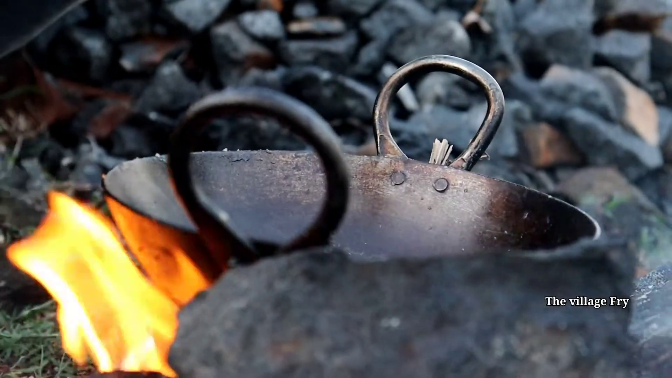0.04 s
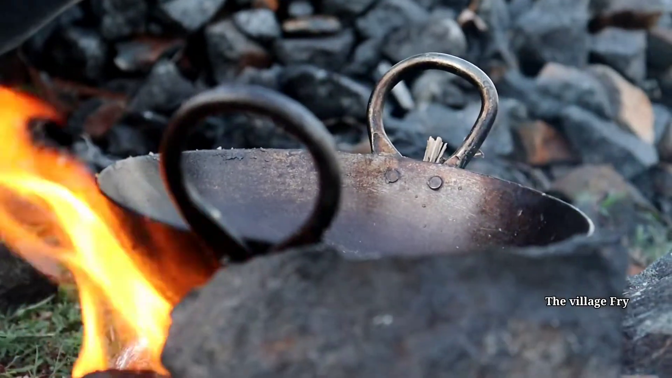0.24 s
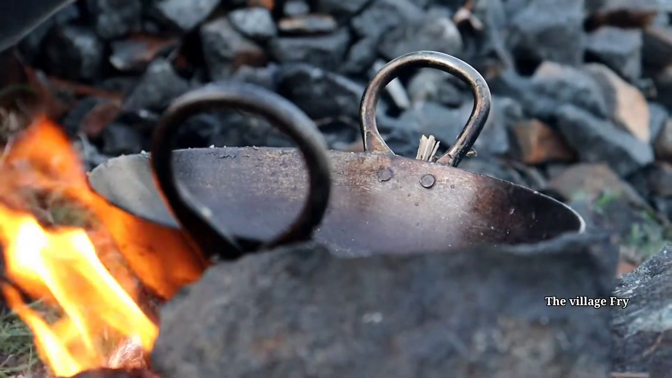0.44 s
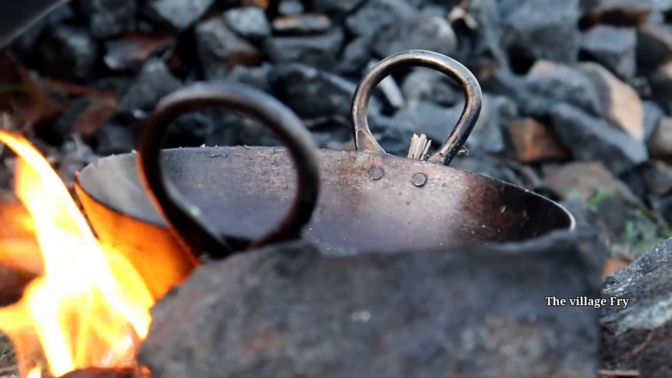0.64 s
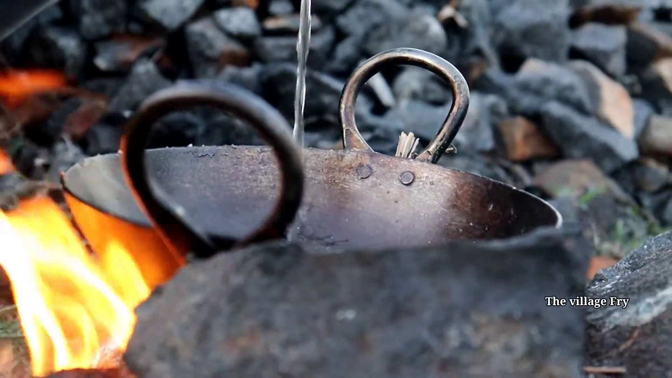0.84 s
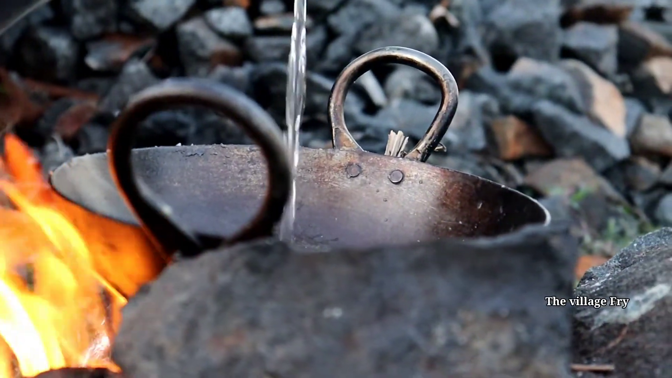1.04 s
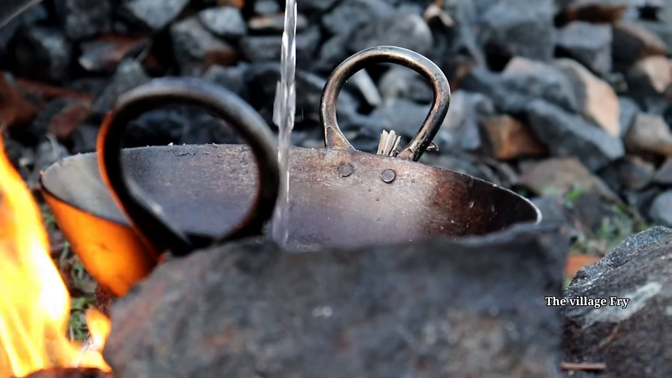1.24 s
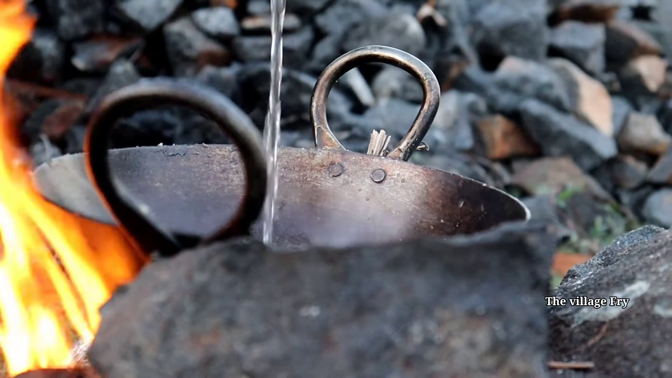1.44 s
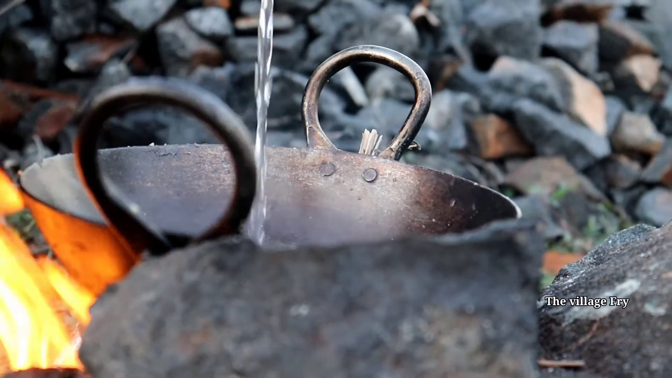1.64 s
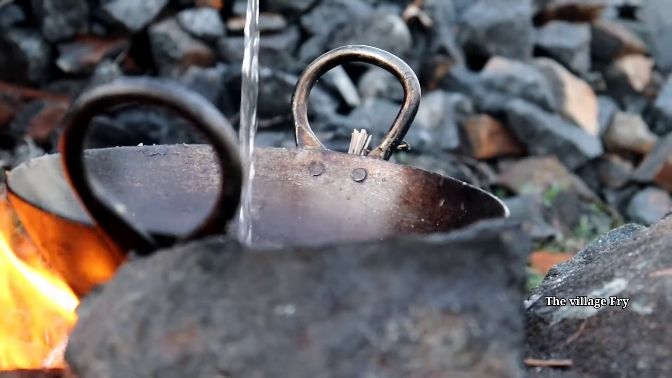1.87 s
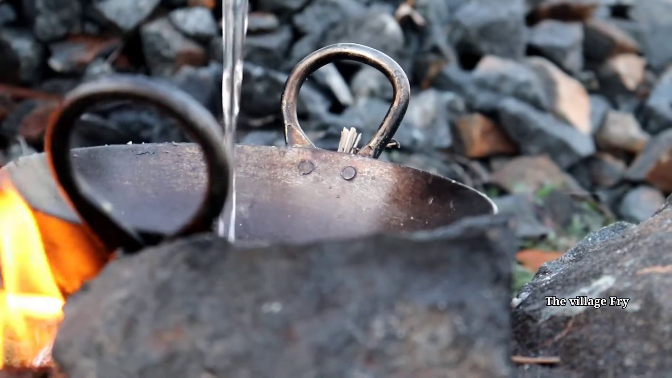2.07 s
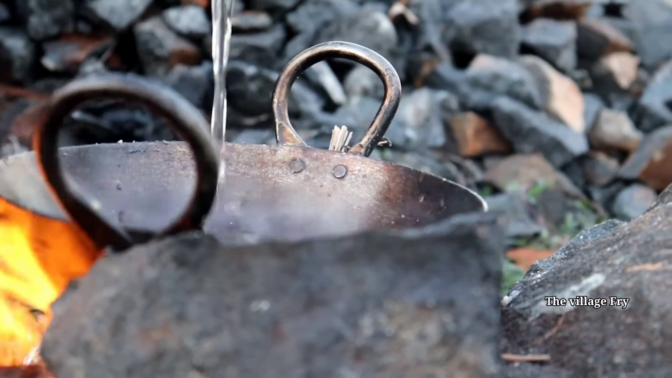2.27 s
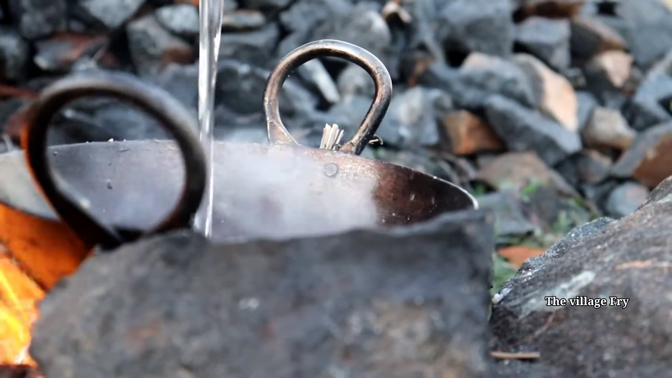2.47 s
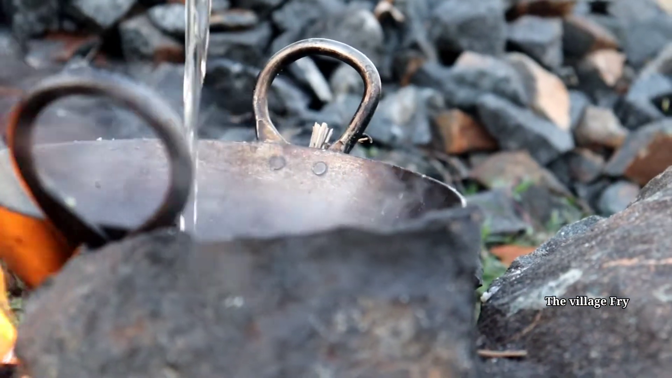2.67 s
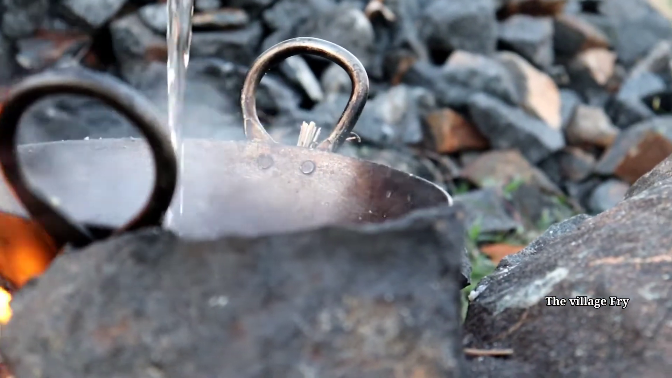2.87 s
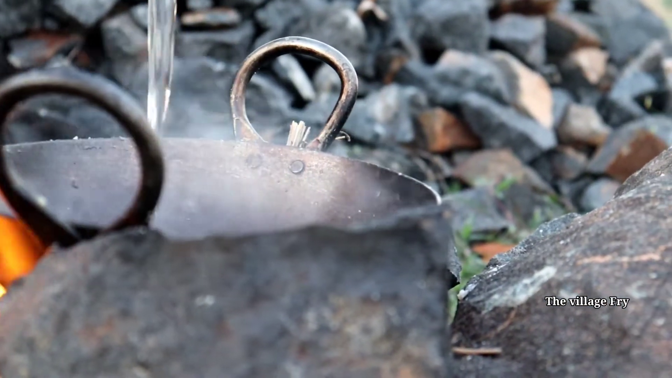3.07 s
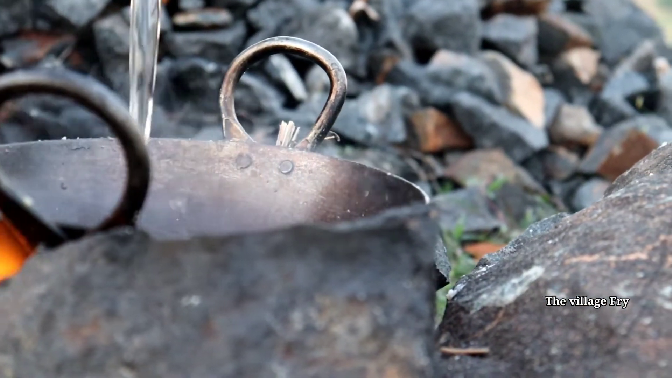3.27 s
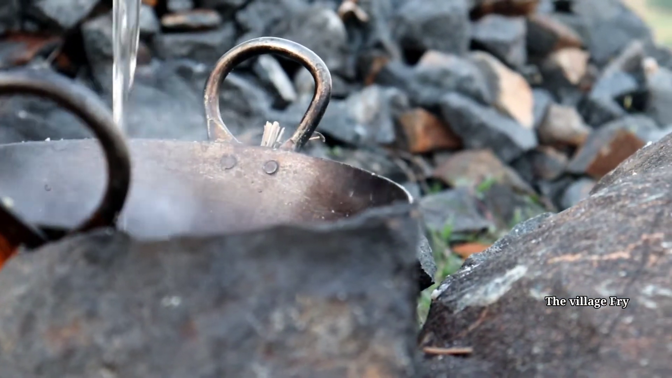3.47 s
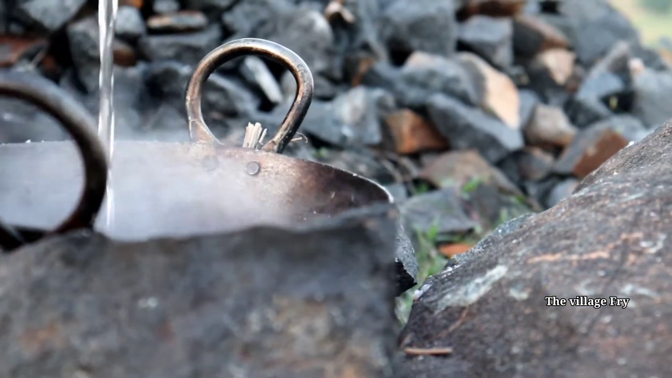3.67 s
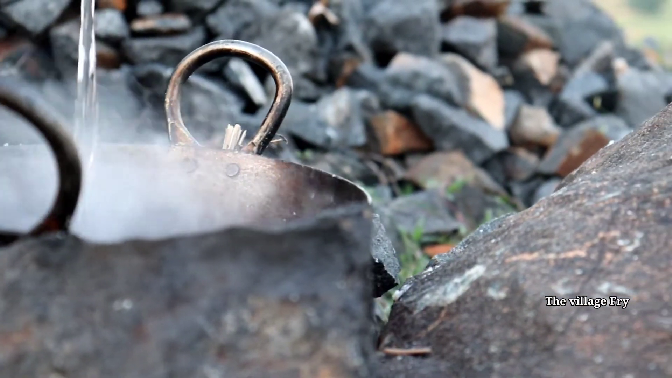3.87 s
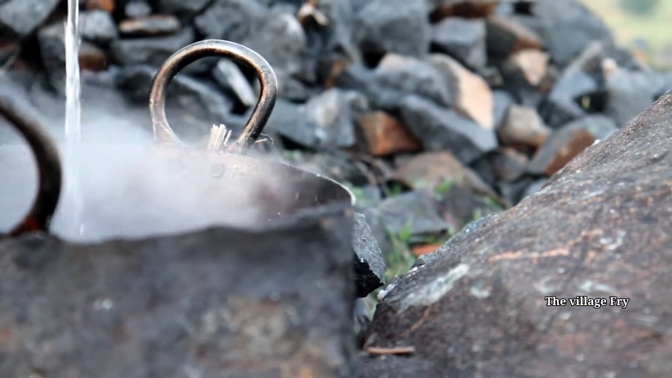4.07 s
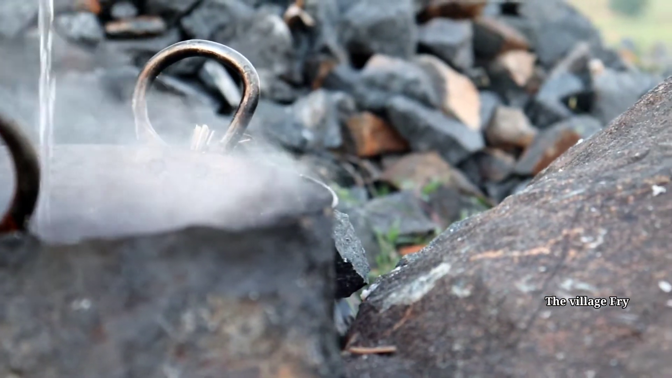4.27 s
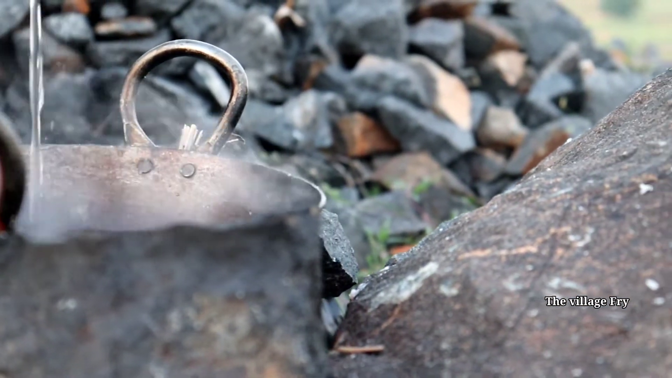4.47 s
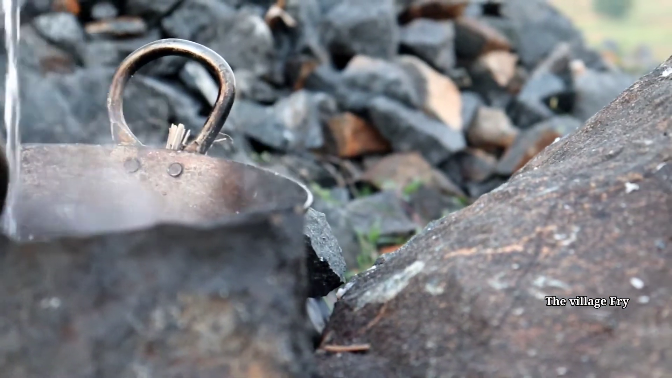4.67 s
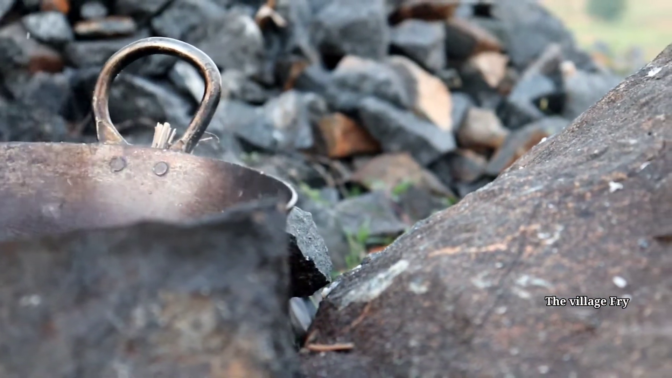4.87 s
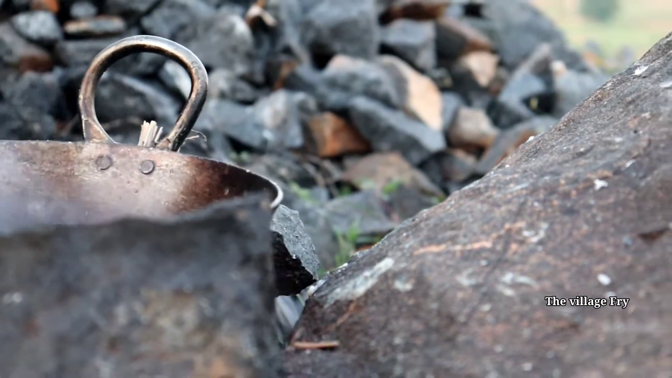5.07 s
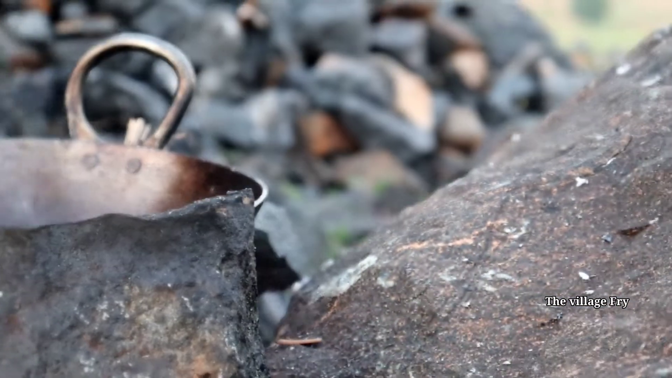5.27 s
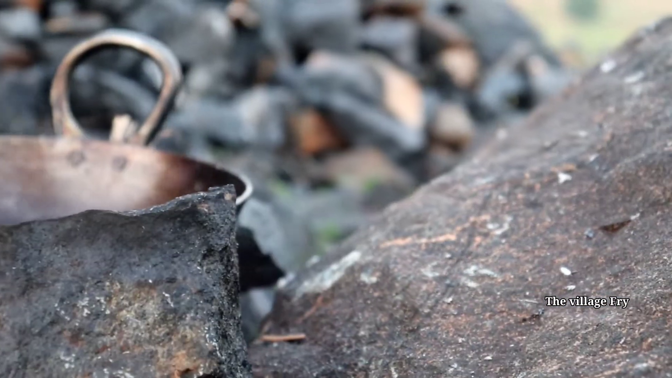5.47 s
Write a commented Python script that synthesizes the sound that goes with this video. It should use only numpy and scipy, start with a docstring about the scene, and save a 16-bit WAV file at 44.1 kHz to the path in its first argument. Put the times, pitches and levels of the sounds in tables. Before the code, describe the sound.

Water hits a scorching iron pan over a wood fire and hisses into steam, with sharp droplet pops, wind thumps and later bubbling.

```python
"""Among stones, over a wood fire, water is poured into a very hot iron pan and flashes into steam.
Steam is drifting noise rung by the pan; bubbles are climbing sines, each loud one with a splash.
Droplets and burning wood are filtered noise bursts, and the fire bed is steady patchy noise.
Wind is low rumble in gusts plus single pressure swings, separate on the two microphone ports."""
import sys
import numpy as np
from scipy import signal
from scipy.fft import rfft, irfft
from scipy.io import wavfile
from scipy.ndimage import uniform_filter1d

SR = 44100
rng = np.random.default_rng(int(sys.argv[2]) if len(sys.argv) > 2 else 0)


def materialize(psi):
    """Save the field psi as 16-bit PCM at rate SR to the path in sys.argv[1].

    A 1-D psi becomes a single channel; in a 2-D psi each row is a channel.
    """
    bounded = np.clip(np.atleast_2d(psi).T, -1, 1)
    quanta = np.round(bounded * 32767).astype(np.int16)
    wavfile.write(sys.argv[1], SR, quanta)


N = 242991  # length in samples

# Flames and open air. Each row: frequency in Hz, relative density in dB.
FIRE_COLOUR = [(30, -31), (100, 9.5), (250, -1), (670, -4.5), (1000, -13.5), (1300, -12.5), (2500, -14),
               (5000, -14), (7000, -18), (15400, -22), (15750, -60)]
FIRE_DB = -52

# Wind rumble. Each row: frequency in Hz, relative density in dB.
BREEZE_COLOUR = [(20, -31), (40, -7), (95, 4), (200, -3), (300, -21), (600, -42.5)]
# Gusts on the ports. Each row: peak time in seconds, level in dB before the port split,
# left minus right in dB, length in seconds.
GUSTS = [(0.01, -38, 0, 0.035), (0.432, -46.5, -4, 0.083), (0.564, -44, -1, 0.11), (1.259, -33, 19, 0.16),
         (1.53, -36.5, -15, 0.2), (2.133, -30, -4, 0.12), (2.23, -37, -9, .22), (2.697, -43, 7, 0.1),
         (2.837, -37.5, 3, 0.1), (3.3, -50, 2, 0.55), (3.855, -40.5, 4, 0.23), (4, -30, -7, 0.15),
         (4.171, -30, -18, 0.034), (4.385, -41.5, -3, 0.36), (4.617, -35, 16, 0.16),
         (4.934, -24.5, -14, 0.25), (5.059, -34, -21, 0.15), (5.176, -41, 1, 0.05), (5.325, -46, 0, 0.069),
         (5.5, -50, -3, 0.11)]
GUST_RISE = 0.44  # share of the length spent rising
GUST_EDGE_DB, CALM_DB = -16, -62.5  # gust ends under their peak; breeze between gusts
# Hard puffs. Each row: start in seconds, level in dB, pitch in Hz, port (0 left, 1 right), cycles.
PUFFS = [(2.094, -6.5, 282, 1, 2.1), (2.101, -5, 149, 1, 1.46), (2.136, -18.5, 190, 0, 1.7),
         (2.173, -17, 126, 1, 1.6), (2.241, -12.5, 111, 1, 1.16), (2.284, -21, 140, 1, 1.8),
         (4.888, -11, 164, 1, 0.87), (4.924, -19, 97, 1, 1.4), (5.012, -24, 102, 0, 3.4),
         (0.56, -24.5, 140, 1, 1.7), (1.21, -20.5, 100, 0, 1.9), (1.261, -20, 130, 0, 1.2),
         (1.533, -22.5, 93.5, 0, 2), (1.558, -15.5, 130, 1, 1.1)]

# Droplets bursting on the iron. Each row: start in seconds, level in dB, left minus right in dB,
# treble in dB over the body.
POPS = [(0.875, -22, 0, 12), (2.9762, 0.5, 3, 9), (3.321, -9, 0, -6), (3.3447, 2.5, -1, 0.5),
        (3.365, -16, 4, 13), (3.3877, -10, 0, -10), (3.5014, -6.5, 4, -12), (4.146, -4.5, 5, 10),
        (5.0816, -12, 2, 1), (5.0882, -16, 15, 8), (5.1232, -9.5, 4, 7), (5.1842, -5, 2, 2.5),
        (5.191, -11, 6, 5), (5.2464, -6.5, 3, 12), (5.34, -19, 2, 13), (5.3934, -18.5, 14, 23)]
# Droplet body. Each row: frequency in Hz, relative density in dB.
POP_BODY = [(300, -24), (700, -5.5), (1300, -11.5), (2300, -0.5), (5500, -0.5), (8000, -4.5), (12000, -29)]
# Droplet treble. Each row: frequency in Hz, relative density in dB.
POP_SPIT = [(3000, -22), (6000, -4), (10000, 0), (14500, -1), (16500, -8)]

# Burning wood snapping. Each row: start in seconds, level in dB,
# treble in dB over a body at full scale (the body is then trimmed to 0.31).
CRACKLES = [(0.098, -30, 8), (0.121, -43, 17), (0.126, -41, 22), (0.155, -14, 8.5), (0.199, -26, 0.5),
            (0.33, -21.5, -11.5), (0.366, -42, 8), (0.384, -49, 13), (0.436, -30, -18), (0.487, -44, -7),
            (0.708, -31, -21), (0.738, -37.5, 13), (0.745, -38, 17), (0.768, -36, 5), (0.794, -21.5, -16)]
# Crackle body. Each row: frequency in Hz, relative density in dB.
WOOD_BODY = [(300, -10), (790, 11), (1100, -1), (1600, -5), (2200, -7), (5000, -17)]
# Crackle treble. Each row: frequency in Hz, relative density in dB.
WOOD_SNAP = [(1000, -18.5), (2100, -12.5), (2500, -3), (3800, -7), (5200, 0.5), (6100, -3.5), (8000, -6.5),
             (15000, -30), (16000, -41)]
SNAP_RING_S = 0.086  # time for the treble to die by 60 dB

# Steam before the pan colours it. Each row: time in seconds, hiss level in dB,
# fine spray in dB over the hiss.
STEAM = [(0.91, -30, 1.5), (0.98, -28, -0.5), (1.18, -29, 1), (1.3, -24.5, -1), (1.37, -27, 0.5),
         (1.42, -27, 5), (1.5, -30.5, 3.5), (1.55, -30.5, 0), (1.66, -33.5, 1), (1.8, -31, 2),
         (2.02, -31, 3), (2.14, -32.5, 6), (2.38, -32, 1), (2.62, -33.5, 2.5), (2.741, -32, 2),
         (3.2, -35.5, 4.5), (3.34, -33.5, 5), (3.58, -30.5, 4), (3.85, -36, 0), (4.3, -35.5, 0),
         (4.9, -37, 0.5), (5.14, -39, 0.5), (5.51, -40.5, 0)]
# Low boil. Each row: frequency in Hz, relative density in dB.
BOIL_COLOUR = [(150, 0.5), (300, -9), (500, 4), (1100, 9), (1500, -10), (2000, -28)]
# Hiss. Each row: frequency in Hz, relative density in dB.
HISS_COLOUR = [(1000, -56), (1300, -0.5), (1600, -5.5), (2600, -1), (3600, -1), (5000, -6.5), (6500, -3.5),
               (8500, -70)]
# Fine spray. Each row: frequency in Hz, relative density in dB.
SPRAY_COLOUR = [(5500, -2.5), (7300, 2), (9000, 0.5), (12500, -0.5), (15450, -0.5), (15750, -49)]
LANDS_S, FAINT_DB = 0.857, -36  # the first water touches the iron, this far under full strength
HISS_RISE_S, SPRAY_RISE_S, BOIL_RISE_S = 0.049, 0.033, 0.12
BOIL_DB, BOIL_FALL_DB_PER_S, BOIL_SWELL_DB = -41.5, -1.4, 1  # the boil weakens as the iron cools
MIST_HZ, MIST_GAIN = 11700, 0.67  # above this the spray swings further, by extra dB per dB

# Air resonances of the pan and hollows in the steam's colour. Each row: frequency in Hz, width in Hz, # then
# lift in dB on the hottest iron, under a puddle, and when full of simmering water.
PAN = [(616, 25, 6.5, 4, -9), (822, 30, -22.5, -16, -12), (1106, 58, 7, 5, 8), (1241, 194, -13, -16, -9),
       (1398, 89, -11, -5.5, -0.5), (1613, 79, -5, 7, 5), (2000, 58, -6, 8, 7.5),
       (2122, 96, 0.5, -5.5, -5.5), (2510, 240, 0, 5.5, 2), (3270, 31, 5, 7, -3), (3555, 83, 9, 3, -3.5),
       (4477, 93, 9, 6.5, 4), (5080, 280, 1, -1, -6.5), (5680, 420, 5, 2.5, -0.5), (7260, 210, 2.5, -3, -4)]
# Water gathering in the pan. Each row: time in seconds, state (0 dry, 1 puddle, 2 full).
FILL = [(1.5, 0), (1.75, 1), (3.7, 1), (3.95, 2)]

# Port likeness of the noise beds. Each row: frequency in Hz, left-right likeness from 0 to 1.
LIKENESS = [(200, 1), (500, 0.95), (1000, 1), (1250, 0.14), (1700, 0.86), (3000, 0.52), (6000, 0.37),
            (9000, 0.19), (15000, 0.12)]
# Port balance of the noise beds. Each row: frequency in Hz, left minus right in dB.
TILT = [(200, 0.5), (1300, -1), (3500, -2), (8000, -0.5), (15000, 2.5)]
LEAD_S = 6.5e-5  # the pan's sound reaches the left port first

# Loud bubbles. Each row: start in seconds, level in dB, starting pitch in Hz,
# length in cycles of that pitch (at least 2 are played).
BUBBLES = [(3.945, -23.5, 800, 4.4), (4.016, -28, 1290, 9), (4.056, -26, 985, 12), (4.091, -28, 600, 8.1),
           (4.103, -29.5, 980, 12), (4.122, -16, 3600, 49), (4.165, -25, 810, 9), (4.195, -27, 980, 12),
           (4.209, -20, 3630, 27), (4.218, -27, 950, 19), (4.239, -9.5, 3000, 11.4), (4.264, -29, 850, 9.8),
           (4.285, -28, 945, 23), (4.308, -27, 1820, 12), (4.348, -27, 1440, 15), (4.38, -23.5, 620, 4),
           (4.422, -19.5, 1030, 9.1), (4.424, -23, 2710, 16), (4.462, -17.5, 2570, 25),
           (4.472, -16, 650, 4.7), (4.474, -18.5, 1480, 10), (4.474, -20, 2600, 18), (4.498, -25, 2650, 35),
           (4.509, -23.5, 584, 11), (4.547, -24.5, 595, 14), (4.569, -29, 920, 12), (4.601, -18, 1830, 22),
           (4.601, -18, 2430, 21), (4.642, -29, 674, 6.8), (4.693, -17.5, 1650, 18),
           (4.709, -24.5, 1040, 6), (4.762, -31, 825, 8), (4.777, -21.5, 3700, 23), (4.784, -29, 885, 5.5),
           (4.805, -21.5, 3300, 25), (4.827, -25.5, 680, 8.2), (4.848, -21.5, 3380, 21),
           (4.863, -27.5, 440, 7.2), (4.899, -23, 660, 2.6), (5.263, -30.5, 1620, 14),
           (5.387, -31, 1125, 41), (5.415, -24, 1290, 29), (5.433, -30, 1060, 27)]
# Small bubbles. Each row: time in seconds, bubbles a second.
SIMMER = [(3.6, 0.81), (3.75, 34), (4.0, 210), (4.85, 190), (5.0, 17), (5.5, 39)]
# Bubble splash. Each row: frequency in Hz, relative density in dB.
SPLASH_COLOUR = [(250, -21), (600, -18), (1500, -3.5), (2700, -18.5), (3500, -12), (6000, -39)]
SPLASH_DB, SPLASH_DB_PER_OCTAVE = -8, -5.5  # over a 1 kHz plop; larger, lower bubbles splash more


def gain_of(db):
    """Decibels to amplitude."""
    return 10 ** (np.asarray(db) / 20)


def evened(x):
    """Scaled to rms 1."""
    return x / np.sqrt(np.mean(x ** 2) + 1e-20)


def read(points, hz):
    """A table read on a log-frequency axis."""
    f, value = np.transpose(points)
    return np.interp(np.log(hz + 1), np.log(f + 1), value)


def add(mix, s, sound):
    """Mixes a sound in at s seconds."""
    part = mix[..., round(s * SR):][..., :sound.shape[-1]]
    part += sound[..., :part.shape[-1]]


def coloured(x, spectrum):
    """Filters x by a spectrum table, rms 1."""
    hz = np.fft.rfftfreq(x.shape[-1], 1 / SR)
    return evened(irfft(rfft(x) * gain_of(read(spectrum, hz)), x.shape[-1]))


def drift(rate_hz, channels=1):
    """Slow chance of rms 1: noise smoothed twice."""
    span = max(int(SR / rate_hz / 2), 2)
    noise = rng.standard_normal((channels, N))
    return evened(uniform_filter1d(uniform_filter1d(noise, span), span))


def pair_noise(spectrum, patchy_db, flicker_db):
    """Random short-time spectra as two ports hear them, with drifting patches and wide flicker."""
    frames, hz = N // 128 + 5, np.fft.rfftfreq(512, 1 / SR)
    a, b, c, d, patches, flicker = rng.standard_normal((frames, 257, 6)).T
    # axis 0 is frequency, axis 1 is time: patches are narrow and slow, flicker wide and quick
    patches = evened(uniform_filter1d(uniform_filter1d(patches, size=7, axis=0), size=24, axis=1))
    flicker = evened(uniform_filter1d(uniform_filter1d(flicker, size=90, axis=0), size=3, axis=1))
    same = np.clip(read(LIKENESS, hz), 0, 1)[:, None]
    left = a + 1j * b
    right = same * left + np.sqrt(1 - same ** 2) * (c + 1j * d)
    right = right * np.exp(-2j * np.pi * hz * LEAD_S)[:, None]
    tilt = gain_of(read(TILT, hz) / 2)[:, None]
    level_db = read(spectrum, hz)[:, None] + patchy_db * patches + flicker_db * flicker
    z = np.array([left * tilt, right / tilt]) * gain_of(level_db)
    return evened(signal.istft(z, nperseg=512, noverlap=384)[1][:, :N])


def burst(spectrum, ring_s, tick):
    """One sharp push and a dying puff of noise, through a causal filter of the given colour; peak 1."""
    t = np.arange(4096) / SR
    push = rng.standard_normal(4096) * gain_of(-60 * t / ring_s) + tick * (t == 0)
    cepstrum = irfft(np.log(gain_of(read(spectrum, np.fft.rfftfreq(4096, 1 / SR)))))
    # folding the cepstrum onto positive times gives the minimum-phase response
    cepstrum[1:2048] *= 2
    cepstrum[2049:] = 0
    x = irfft(rfft(push) * np.exp(rfft(cepstrum)))
    return x / abs(x).max()


def among_stones(x, lead_s, wet_db, t60):
    """The right port hears a moment later; the stones scatter a short tail, different per port."""
    hz = np.fft.rfftfreq(N, 1 / SR)
    late = irfft(rfft(x) * np.exp(-2j * np.pi * hz * np.array([[0], [lead_s]])), N)
    t = np.arange(4000) / SR
    signs = rng.choice([-1., 1.], (2, 4000))
    sparse = rng.random((2, 4000)) < .3
    taps = signs * sparse * gain_of(-60 * t / t60) * (t > .001)
    tail = signal.fftconvolve(late, taps / np.linalg.norm(taps[0]), axes=1)[:, :N]
    return late + gain_of(wet_db) * tail


def fire():
    """Flames and open air: a steady bed of noise with patchy, flickering colour."""
    return gain_of(FIRE_DB) * pair_noise(FIRE_COLOUR, patchy_db=2.5, flicker_db=2.0)


def wind():
    """Lumpy rumble in gusts, unrelated on the two ports, and single hard puffs."""
    t = np.arange(N) / SR
    power = gain_of(2 * CALM_DB) * np.ones((2, N))
    for s, db, pan_db, length in GUSTS:
        away = np.where(t < s, (s - t) / GUST_RISE, (t - s) / (1 - GUST_RISE)) / length
        ratio = gain_of(pan_db)
        ports = 2 * np.array([[ratio], [1]]) / np.sqrt(1 + ratio ** 2)
        power = power + (ports * gain_of(db + GUST_EDGE_DB * away ** 1.11)) ** 2
    breeze = coloured(rng.standard_normal((2, N)), BREEZE_COLOUR)
    rumble = evened(breeze * gain_of(2.2 * drift(rate_hz=30, channels=2)))
    out = np.sqrt(power) * rumble
    for s, db, hz, port, cycles in PUFFS:
        u = np.arange(0, 1, hz / cycles / SR)
        swing = np.sin(2 * np.pi * cycles * u ** 1.03)  # quickens very slightly
        swell = np.sin(np.pi * u ** 0.68) ** 1.13
        add(out[int(port > .5)], s, -gain_of(db) * swing * swell)
    return out


def pop(treble_db):
    """A bursting droplet: a dull body and a thin spit, peak 1."""
    body = burst(POP_BODY, ring_s=.008, tick=9)
    x = body + gain_of(treble_db) * burst(POP_SPIT, ring_s=.006, tick=4.5)
    return x / abs(x).max()


def pops():
    """A sizzle dying at the start, the single droplets, and a random spatter that follows the hiss."""
    out = np.zeros((2, N))
    for s, db, pan_db, treble_db in POPS:
        add(out, s, gain_of(db + np.array([[pan_db], [-pan_db]]) / 2) * pop(treble_db))
    sizzle_body = gain_of(-32.5) * burst(POP_BODY, ring_s=0.21, tick=0)
    sizzle_treble = gain_of(-32) * burst(POP_SPIT, ring_s=0.22, tick=0)
    add(out, 0, sizzle_body + sizzle_treble)
    level = gain_of(np.interp(np.arange(N) / SR, *np.transpose(STEAM)[:2], left=-120))
    size = gain_of(3.5 * np.minimum(rng.exponential(1, N), 3.2))
    hits = size * (rng.random(N) < 130 / SR)  # about 130 a second
    return out + gain_of(7) * level * signal.oaconvolve(hits, pop(-3))[:N]


def crackles():
    """Burning wood snaps: each has a bright crack and a longer wooden body."""
    out = np.zeros(N)
    for s, db, treble_db in CRACKLES:
        crack = gain_of(treble_db) * burst(WOOD_SNAP, SNAP_RING_S, tick=13.6)
        body = 0.31 * burst(WOOD_BODY, 1.37 * SNAP_RING_S, tick=9.0)
        add(out, s + 0.00102, gain_of(db) * (crack + body))
    return out


def in_pan(x):
    """The pan colours the steam; its resonances change as water gathers in it."""
    hz = np.fft.rfftfreq(N, 1 / SR)
    fill = np.interp(np.arange(N) / SR, *np.transpose(FILL))
    f, width, *lifts = np.transpose(PAN)
    shapes = 1 / (1 + (2 * (hz[:, None] - f) / width) ** 2)
    out = 0
    for state, lift_db in enumerate(lifts):
        share = np.maximum(1 - abs(fill - state), 0)  # crossfade between neighbouring states
        out = out + share * irfft(rfft(x) * gain_of(shapes @ lift_db), N)
    return out


def steam():
    """Hiss and spray follow the flashing water over a slowly weakening boil, silent until it lands."""
    s, hiss_db, spray_db = np.transpose(STEAM)
    t = np.arange(N) / SR

    def landing(rise_s):
        """Silence, then a climb from faint to full strength."""
        return (t > LANDS_S) * gain_of(FAINT_DB * np.clip(1 - (t - LANDS_S) / rise_s, 0, 1))

    hiss = gain_of(np.interp(t, s, hiss_db))
    spray = gain_of(np.interp(t, s, hiss_db + spray_db))
    swell_db = BOIL_SWELL_DB * drift(rate_hz=8.5)
    boil = gain_of(BOIL_DB + BOIL_FALL_DB_PER_S * (t - LANDS_S) + swell_db)
    fine = pair_noise(SPRAY_COLOUR, patchy_db=0.6, flicker_db=1.3)
    mist = signal.sosfiltfilt(signal.butter(4, MIST_HZ, "high", fs=SR, output="sos"), fine)
    mist_db = MIST_GAIN * (np.interp(t, s, spray_db) - spray_db.mean())
    fine = fine + (gain_of(mist_db) - 1) * mist
    surge = gain_of(.5 * drift(rate_hz=12))  # the stream wobbles
    hiss = landing(HISS_RISE_S) * hiss * pair_noise(HISS_COLOUR, patchy_db=1.5, flicker_db=0.84)
    spray = landing(SPRAY_RISE_S) * spray * fine
    boil = landing(BOIL_RISE_S) * boil * pair_noise(BOIL_COLOUR, patchy_db=1.0, flicker_db=1.7)
    return in_pan(surge * (hiss + spray + boil))


def bubble(hz, cycles, rise):
    """A dying sine whose pitch climbs as the bubble nears the surface."""
    u = np.arange(0, 1, hz / cycles / SR)
    tone = np.sin(2 * np.pi * cycles * (u + rise * u * u))
    return tone * np.exp(-4.2 * u) * (1 - np.exp(-u / 0.042)) * 1.5


def bubbles():
    """The loud plops, each with a brief splash, and a random simmer of small ones."""
    out = np.zeros(N)
    for s, db, hz, cycles in BUBBLES:
        splash_db = SPLASH_DB + SPLASH_DB_PER_OCTAVE * np.log2(hz / 1e3)
        add(out, s, gain_of(db) * bubble(hz, max(cycles, 2), rise=0.11))
        add(out, s + 0.00086, gain_of(db + splash_db) * burst(SPLASH_COLOUR, ring_s=0.04, tick=1.7))
    rate = np.interp(np.arange(N) / SR, *np.transpose(SIMMER), left=0)
    chance, size, pick, lasts = rng.random((N, 4)).T
    for i in np.flatnonzero(chance < rate / SR):
        db = -38.5 - 2.9 * np.log(size[i] + 0.089)
        hz = 550 * 6.5 ** pick[i] ** 1.6  # favours the low end of 550 to 3575 Hz
        add(out, i / SR, gain_of(db) * bubble(hz, cycles=6 + 14 * lasts[i], rise=0.14))
    return out


def scene():
    """Everything at the two ports."""
    near = among_stones(bubbles() + crackles(), LEAD_S, wet_db=-13, t60=.06)
    # droplets fly out towards the middle
    spits = among_stones(pops(), lead_s=2.5e-5, wet_db=-14, t60=.04)
    return near + spits + steam() + wind() + fire()


def record(dry):
    """The microphone drops the deepest bass; then the band limit at 16.4 kHz."""
    thin = signal.sosfilt(signal.butter(3, 42, "high", fs=SR, output="sos"), dry)
    lowpass = signal.firwin(511, 16400, window=("kaiser", 9), fs=SR)
    return signal.oaconvolve(thin, lowpass[None], "same")


dry = scene()
out = record(dry)
materialize(out)
```